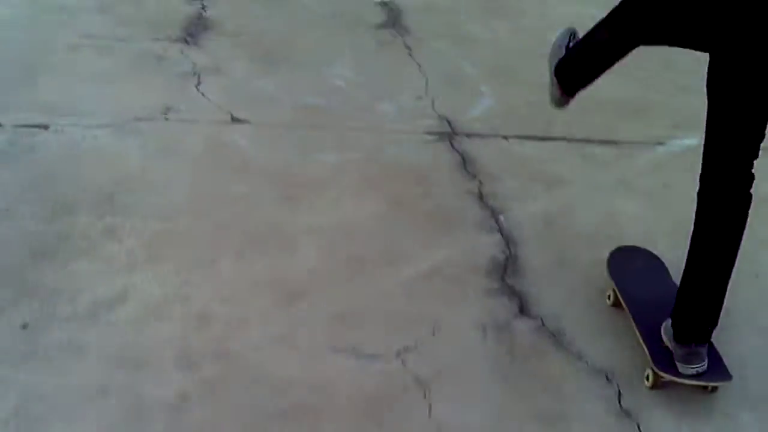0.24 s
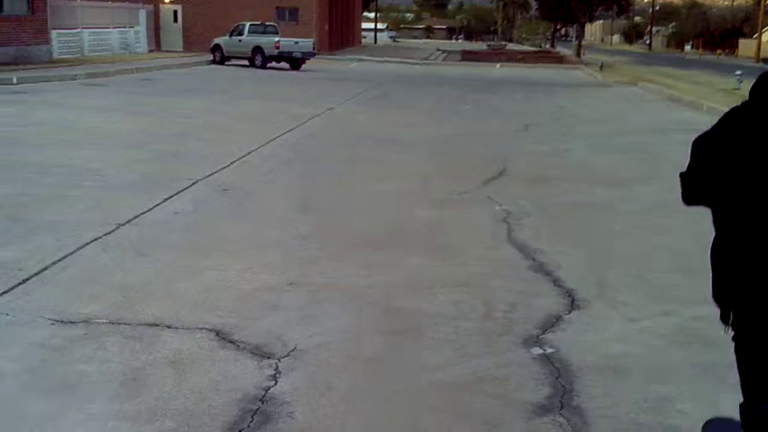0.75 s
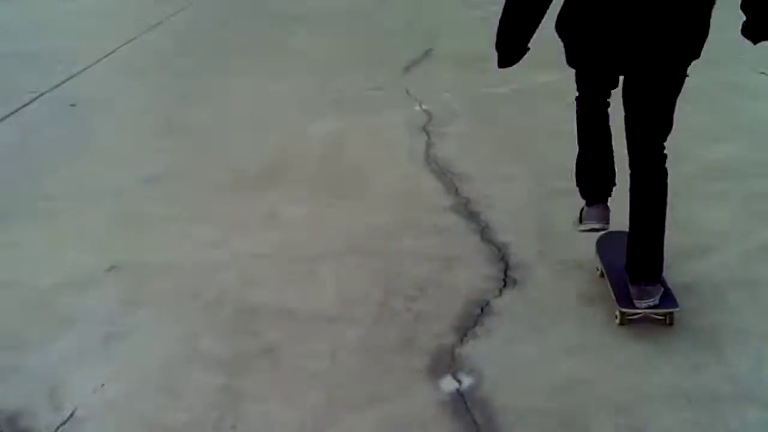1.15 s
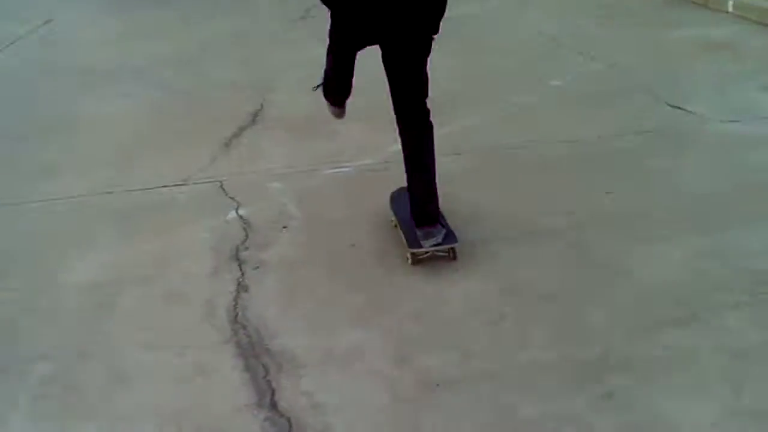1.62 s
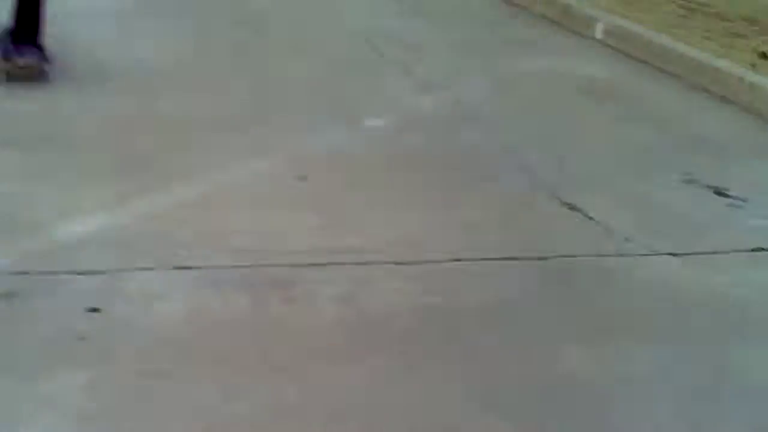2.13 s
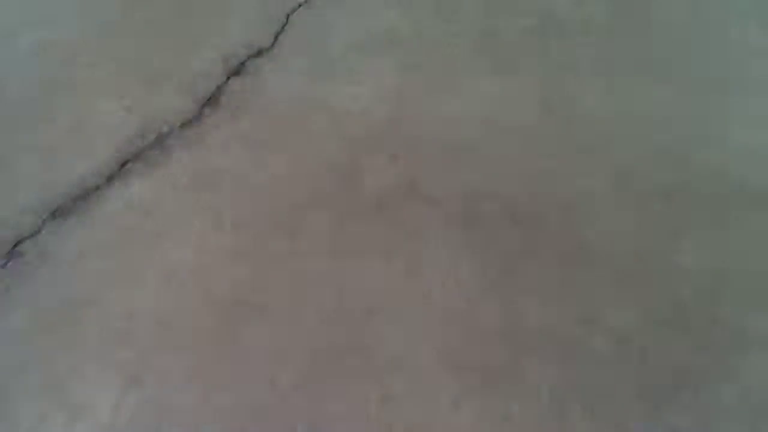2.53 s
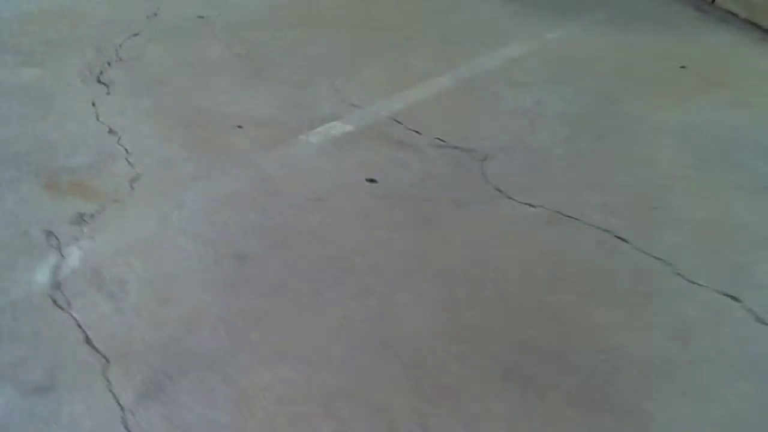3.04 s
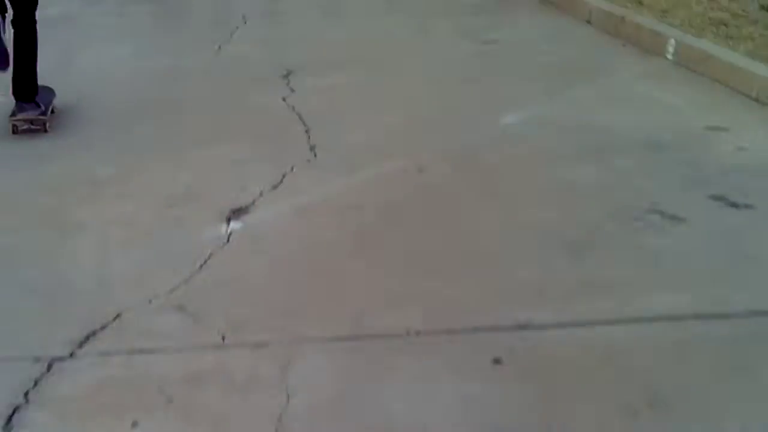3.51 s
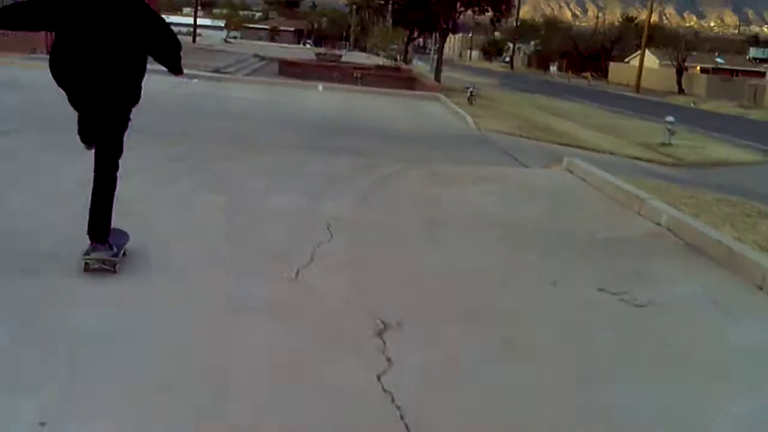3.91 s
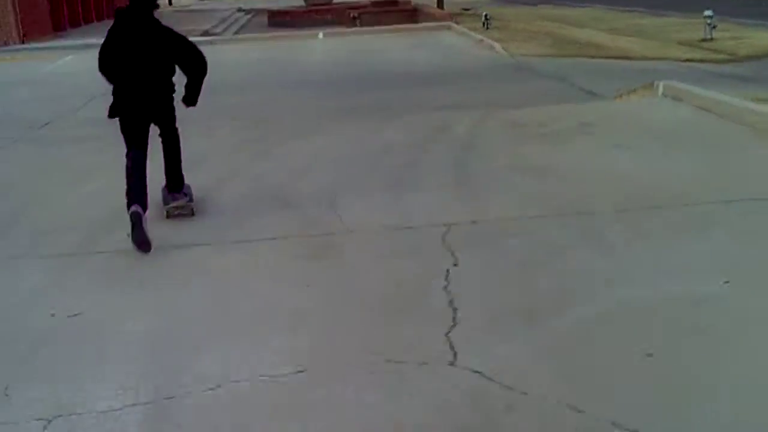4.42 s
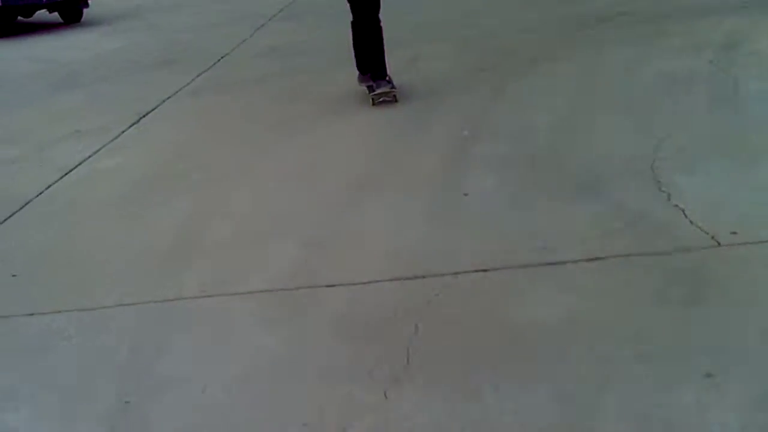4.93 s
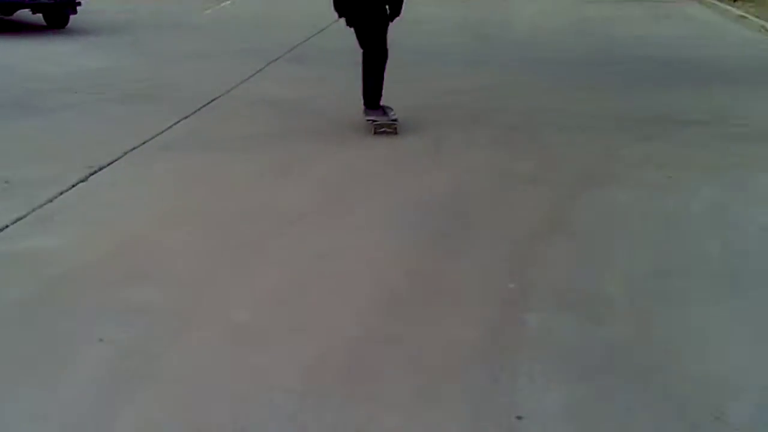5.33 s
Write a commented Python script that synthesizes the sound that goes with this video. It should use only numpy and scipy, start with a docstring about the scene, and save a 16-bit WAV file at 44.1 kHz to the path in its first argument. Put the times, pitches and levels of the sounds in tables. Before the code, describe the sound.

A skateboard rolls away over gritty pavement, its rumble and sharp clacks growing fainter while light wind buffets the microphone.

```python
"""A skateboard drums and rattles over concrete, then slowly pulls away.
Grit under the wheels forces the deck to vibrate at its resonances; the drumming sinks whenever the
rider's weight leaves the deck, and rough stretches rattle and rasp. At joints and cracks the wheels
clack and rebound. Sand grains tick, faint narrow bands of noise swell and fade over the rolling,
and gusts buffet the microphone."""
import sys
import numpy as np
from scipy import signal
from scipy.fft import rfft, irfft, next_fast_len
from scipy.io import wavfile
from scipy.ndimage import uniform_filter1d, map_coordinates

SR = 44100
rng = np.random.default_rng(int(sys.argv[2]) if len(sys.argv) > 2 else 0)


def transcribe(signal):
    """Save signal, clipped to [-1, 1], as a 16-bit WAV file at the path in sys.argv[1]."""
    frames = np.atleast_2d(signal).T
    limited = np.clip(frames, -1, 1)
    pcm = np.round(limited * 32767).astype(np.int16)
    wavfile.write(sys.argv[1], SR, pcm)


N = 245195


def amp(db):
    """Amplitude ratio of a level in decibels."""
    return 10 ** (np.asarray(db) / 20)


def unit(x):
    """Normalisation to rms 1."""
    return x / np.sqrt(np.mean(x ** 2) + 1e-20)


def wobble(rate):
    """Smooth random modulation: a spline through `rate` Gaussian values a second."""
    return map_coordinates(rng.standard_normal(int(N * rate / SR) + 4), [np.arange(N) * rate / SR])


def arch(start, end):
    """Envelope close to a half sine: from 0 to 1 and back between two times."""
    progress = np.clip((np.arange(N) / SR - start) / (end - start), 0, 1)
    return np.abs(np.sin(np.pi * progress)) ** 1.07


def swells(rows):
    """Superposed arches, one per row (start, end, heights): a curve for each column of heights."""
    return sum(np.outer(heights, arch(start, end)) for start, end, *heights in rows)


def response(spectrum, resonances=(), size=8192):
    """Minimum-phase impulse response of a spectrum with resonance peaks, by the folded cepstrum."""
    hz = np.fft.rfftfreq(size, 1 / SR)
    f, level = np.transpose(spectrum)
    db = np.interp(np.log(hz + 1), np.log(f + 1), level)
    for centre, width, lift in resonances:
        db = db + lift / (1 + (2 * (hz - centre) / width) ** 2)
    cepstrum = irfft(np.log(amp(db)))
    cepstrum[1:size // 2] *= 2
    cepstrum[size // 2 + 1:] = 0
    return irfft(np.exp(rfft(cepstrum)))[:size // 2]


def coloured(x, spectrum, resonances=()):
    """Source and filter: the excitation x convolved with an impulse response, at rms 1."""
    return unit(signal.fftconvolve(x, response(spectrum, resonances))[:len(x)])


# spectrum of the wind's pressure (f/Hz, relative level/dB)
BUFFET_SPECTRUM = [(8, -13), (22, 2.5), (45, -5.5), (80, -8), (140, -13), (300, -23), (800, -61)]
# gusts over a light breeze (start t/s, end t/s, lift/dB)
GUSTS = [(0.54, 1.2, 6), (1.84, 2.14, 18), (2.14, 2.68, 16.5), (2.9, 3.42, 12.5), (3.62, 4.42, 7),
         (4.2, 5.0, 8.5)]
def wind(breeze_db=-44):
    """Turbulence: eddies press on the microphone port, harder in each gust."""
    gust_db, = swells(GUSTS)
    eddies_db = 2.2 * wobble(13)
    return amp(breeze_db + gust_db + eddies_db) * coloured(rng.standard_normal(N), BUFFET_SPECTRUM)


# faint narrow bands of noise (start t/s, end t/s, centre f/Hz, bandwidth/Hz, level/dB)
NOISE_BANDS = [(0.0, 0.614, 4640, 407, -64.5), (0.42, 0.72, 2160, 350, -47), (1.61, 1.78, 3810, 500, -56.5),
               (3.546, 4.153, 3450, 304, -63), (4.203, 5.5, 1650, 300, -55)]
def noise_bands():
    """Band-pass filtering: faint narrow bands of noise swell and fade over the rolling."""
    out = np.zeros(N)
    for start, end, hz, width, db in NOISE_BANDS:
        bandpass = signal.butter(2, [hz - width / 2, hz + width / 2], "bandpass", fs=SR)
        band = signal.lfilter(*bandpass, rng.standard_normal(N))
        out += amp(db) * arch(start, end) * unit(band)
    return out


# spectrum of a bursting grain (f/Hz, relative level/dB)
GRAIN_SPECTRUM = [(1500, -20.5), (3000, -3), (4200, -3), (5200, -11), (6200, -13)]
# single grains cracking (t/s, peak level/dB)
GRAIN_BURSTS = [(0.640, -28), (1.088, -24.5), (1.396, -28), (2.587, -36), (3.099, -36)]
def sand_ticks():
    """Brittle fracture: a grain of sand bursts in one impulse, heard as a tiny bright tick."""
    impulses = np.zeros(N)
    for start, db in GRAIN_BURSTS:
        impulses[round(start * SR)] = amp(db)
    tick = response(GRAIN_SPECTRUM)[:512]
    return signal.fftconvolve(impulses, tick / np.abs(tick).max())[:N]


def grit(rate, spread_db):
    """Shot noise: the force of tiny random contacts, `rate` a second, log-normal in size."""
    touch = rng.random(N) < rate / SR
    return unit(touch * rng.choice([-1, 1], N) * amp(spread_db * rng.standard_normal(N)))


# spectra of the sand's rasp and the wheels' hiss (f/Hz, relative level/dB)
RASP_SPECTRUM = [(900, -16), (1600, 4.5), (2100, 0), (2500, -6.5), (3000, -11), (4000, -22), (5500, -46.5)]
HISS_SPECTRUM = [(1500, -14), (2600, -3.5), (3300, -0.5), (3650, -2), (4000, 2), (4500, -5), (5000, -15),
                 (5500, -23), (6200, -45.5)]
def crushed_sand(near_db, unload_db, sandy_db):
    """Direct radiation: sand crushed under the wheels is too fine to shake the deck."""
    load_db = -.32 * unload_db
    rasp_db = -50.5 + near_db + load_db + sandy_db + 2.3 * wobble(22)
    hiss_db = -58 + .83 * near_db + load_db + .94 * sandy_db + .79 * wobble(19)
    rasp = amp(rasp_db) * coloured(grit(rate=5500, spread_db=5.5), RASP_SPECTRUM)
    hiss = amp(hiss_db) * coloured(grit(rate=9000, spread_db=6.5), HISS_SPECTRUM)
    return rasp + hiss


# resonances of the deck and trucks (f/Hz, bandwidth/Hz, lift/dB)
DECK_MODES = [(160.6, 20, 5.5), (501.7, 84, 8.5), (687, 78, 2.5), (1175, 220, 4), (1406, 170, 3.5)]
# spectra of the deck's rumble and drumming and the wheels' rattle (f/Hz, relative level/dB)
RUMBLE_SPECTRUM = [(60, -31), (120, -10), (180, 2.5), (320, 5), (420, 2), (700, -48)]
DRUM_SPECTRUM = [(150, -31.5), (300, -10), (430, -6.5), (600, 0.5), (800, -4), (1000, -16), (1400, -28),
                 (2500, -58)]
RATTLE_SPECTRUM = [(500, -25), (800, 1.5), (1000, -2), (1300, -1.5), (1550, -11.5), (1800, -18.5),
                   (2300, -36.5), (3200, -48), (5500, -72)]
def deck_vibration(near_db, unload_db, coarse_db):
    """Forced vibration: grit drives the deck's modes, harder under load. Returns (lows, rattle)."""
    drum_db = -21.5 + near_db - unload_db
    rattle_db = -29 + near_db - .41 * unload_db + coarse_db
    rumble_db = -33 + near_db - .43 * unload_db
    drum = amp(drum_db) * coloured(grit(rate=7000, spread_db=3), DRUM_SPECTRUM, DECK_MODES)
    rattle = amp(rattle_db) * coloured(grit(rate=3000, spread_db=3), RATTLE_SPECTRUM, DECK_MODES)
    rumble = amp(rumble_db) * coloured(grit(rate=4000, spread_db=3), RUMBLE_SPECTRUM, DECK_MODES)
    return drum + rumble, rattle


def beaming(x, depth_db, size=1024):
    """Directivity: narrow bands swell and fade at random as the board turns against the microphone."""
    spectra = signal.stft(x, nperseg=size)[2]
    field = rng.standard_normal(spectra.shape)
    for _ in range(2):
        field = uniform_filter1d(field, size=7, axis=0)  # across frequency
        field = uniform_filter1d(field, size=20, axis=1)  # across time
    return signal.istft(spectra * amp(depth_db * unit(field)), nperseg=size)[1][:N]


# fading as the board pulls away (t/s, relative level/dB)
RECESSION = [(0.0, -2), (0.12, -1), (0.39, 2.5), (0.55, 0.5), (1.1, 0), (2.25, -0.5), (3.05, -4), (4.0, -9),
             (4.3, -12), (5.25, -15), (5.56, -20.5)]
# the rider takes weight off the deck to push or shift (start t/s, end t/s, drop of the drumming/dB)
UNLOADS = [(0.64, 0.88, 5), (1.28, 2.12, 13.5), (2.28, 2.88, 12), (3.0, 3.44, 3.5), (4.17, 4.45, 3.5),
           (4.58, 4.86, 1.5)]
# rough stretches of the slab (start t/s, end t/s, lift of the rattle/dB, lift of the rasp/dB)
ROUGH_STRETCHES = [(0.14, 0.36, 4.5, 3.5), (0.36, 0.64, -2, 3.5), (0.54, 0.8, 4, 1), (0.9, 1.12, 3, 3),
                   (1.82, 2.12, 4, 11), (2.02, 2.2, 7, 6), (2.4, 2.88, 1, 6), (3.55, 3.98, 5.5, 1.5),
                   (3.92, 4.2, 4, 9), (4.82, 5.1, 3, 0)]
def rolling():
    """Rolling noise: its level follows distance, load and roughness; uneven wheels make it flutter."""
    near_db = np.interp(np.arange(N) / SR, *np.transpose(RECESSION))
    unload_db, = swells(UNLOADS)
    coarse_db, sandy_db = swells(ROUGH_STRETCHES)
    flutter = amp(.45 * wobble(35) + .6 * wobble(130))
    lows, rattle = deck_vibration(near_db, unload_db, coarse_db)
    sand = crushed_sand(near_db, unload_db, sandy_db)
    # short waves beam more than long ones
    return flutter * (beaming(lows, depth_db=1.05) + beaming(rattle + sand, depth_db=1.75))


def impact(spectrum, resonances, chatter, t60, size=2048):
    """Impulse excitation: a sharp push, then decaying chatter, with the energy of 5 ms at rms 1."""
    t = np.arange(size) / SR
    push = coloured(1. * (t == 0), spectrum, resonances)
    settle = coloured(rng.standard_normal(size) * amp(-60 * t / t60), spectrum, resonances)
    return unit(push + chatter * settle) * np.sqrt(.005 * SR / size)


# spectra of the deck's thud, the truck's knock and the edge's snap (f/Hz, relative level/dB)
THUD_SPECTRUM = [(60, -33.5), (170, -12), (300, -10), (480, -6), (680, -3), (850, -9.5), (1100, -22),
                 (1800, -47.5), (4000, -65.5)]
KNOCK_SPECTRUM = [(450, -33), (750, -12), (930, 8.5), (1200, 0.5), (1480, -0.5), (1620, -6), (1850, -28),
                  (2600, -32), (5500, -67.5)]
SNAP_SPECTRUM = [(900, -17.5), (1600, 9), (2100, 6.5), (2700, -5), (3300, -8.5), (3650, -5), (4200, -10),
                 (5200, -26), (6200, -42)]
# wheels strike a joint, crack or pebble
# (t/s, thud level/dB, knock level/dB, snap level/dB, loss per rebound/dB, lift of the truck's ring/dB)
STRIKES = [(0.193, -15.5, -22, -37, 9, 2), (0.404, -15, -31, -51, 2.5, 1),
           (0.841, -16.5, -13, -32, -1, -0.5), (0.852, -14.5, -15.5, -35, 3.5, 1),
           (1.024, -13.5, -40, -55, 4, -2), (1.235, -18.5, -23.5, -29, 1.5, 3),
           (1.294, -39, -33, -39, 14, 2), (1.333, -5, -7.5, -24, 5.5, 4), (2.059, -26, -21, -45, 11, 0),
           (2.168, -18.5, -30, -48, 4.5, 0), (2.195, -19, -29, -52, 10.5, 0),
           (2.792, -14, -13.5, -23, 2.5, -9), (2.857, -14.5, -15, -30, 4, -8),
           (3.122, -23, -25.5, -45, 9, 3), (3.169, -25, -30.5, -61, 8, -1),
           (3.407, -22.5, -22.5, -44, 0.5, -12), (3.492, -24.5, -21, -38.5, 4, 3),
           (4.054, -21.5, -21, -36, 13, 9), (4.11, -25, -27, -34, 8, -3), (4.184, -19, -36, -41, 12, 0),
           (4.198, -21.5, -36, -40.5, 12, -1), (4.291, -34, -41, -47.5, 10, -8),
           (4.497, -29, -32.5, -47.5, 11, 4), (4.816, -32, -38, -70, 12.5, 0),
           (4.877, -28.5, -31.5, -46, 1, 2), (4.922, -30, -33, -48, 9, -1), (5.187, -25, -38, -64, 9, 0),
           (5.283, -27, -46, -60, 4, 0), (5.372, -32.5, -44, -66, 10, 1)]
def clacks(contacts=3, rebound_s=.0047, truck_hz=933, truck_width_hz=260):
    """Impact and rebound: at each contact the deck thuds, the truck knocks, the concrete edge snaps."""
    out = np.zeros(N + SR)
    for start, thud_db, knock_db, snap_db, loss_db, ring_db in STRIKES:
        flights = rebound_s * np.exp(.12 * rng.standard_normal(contacts))
        # the truck rings more or less by where it is struck
        truck_modes = [*DECK_MODES, (truck_hz, truck_width_hz, ring_db)]
        for k in range(contacts):
            thud = amp(thud_db) * impact(THUD_SPECTRUM, DECK_MODES, chatter=.5, t60=.027)
            # each rebound is softer, so knock and snap fall faster than the thud
            knock = amp(knock_db - 2 * k) * impact(KNOCK_SPECTRUM, truck_modes, chatter=.9, t60=.03)
            snap = amp(snap_db - 5.5 * k) * impact(SNAP_SPECTRUM, (), chatter=1.1, t60=.04)
            onset = round((start + flights[:k].sum()) * SR)
            out[onset:onset + len(thud)] += amp(-k * loss_db) * (thud + knock + snap)
    return out[:N]


def scene():
    """Superposition: board and wind add at one microphone in the open."""
    return (rolling() + noise_bands() + clacks() + sand_ticks() + wind())[None]


def low_pass(x, top_hz, taper_hz=900):
    """Band limiting: the gain falls linearly over taper_hz to zero at top_hz."""
    size = next_fast_len(N + SR // 2)
    hz = np.fft.rfftfreq(size, 1 / SR)
    gain = np.clip((top_hz - hz) / taper_hz, 0, 1)
    return irfft(rfft(x, size) * gain, size)[:, :N]


def record(dry, overload=.81, ceiling=.71):
    """Saturation: a narrow-band microphone rounds hard clacks; peaks that still clip splash treble."""
    rounded = dry / (1 + np.abs(dry / overload) ** 4) ** (1 / 4)
    narrow = low_pass(rounded, top_hz=6100)
    return low_pass(np.clip(narrow, -ceiling, ceiling), top_hz=16000)


dry = scene()
out = record(dry)
transcribe(out)
```